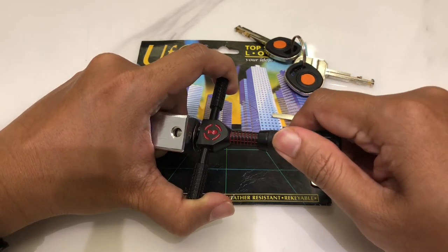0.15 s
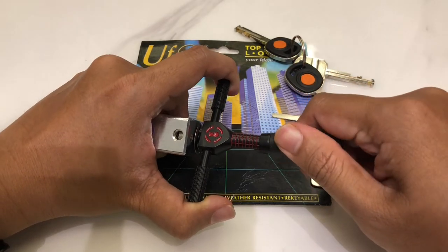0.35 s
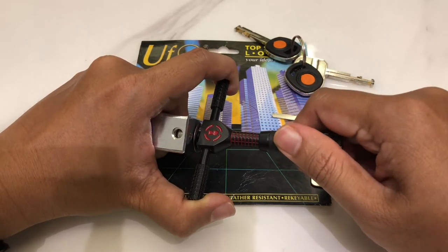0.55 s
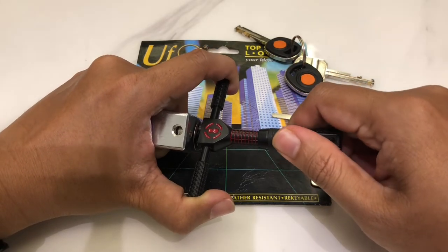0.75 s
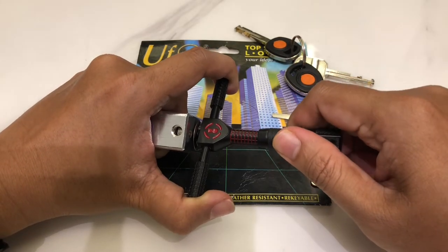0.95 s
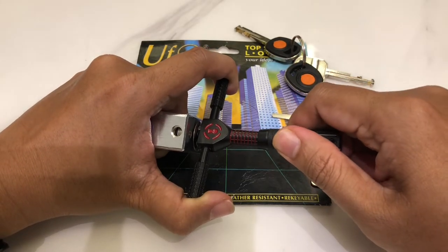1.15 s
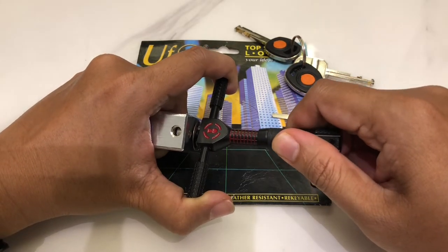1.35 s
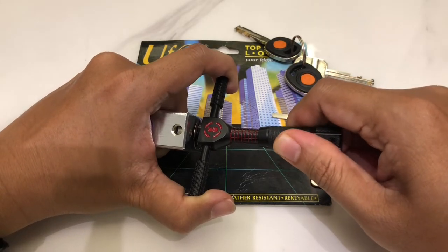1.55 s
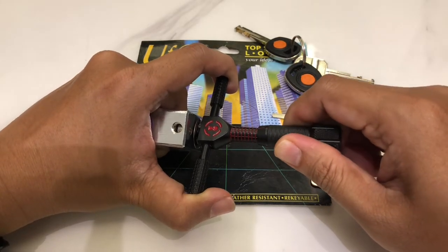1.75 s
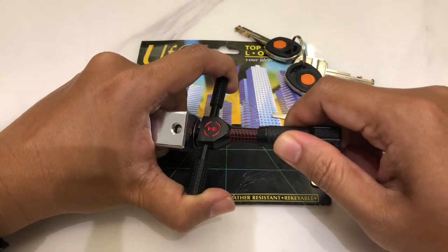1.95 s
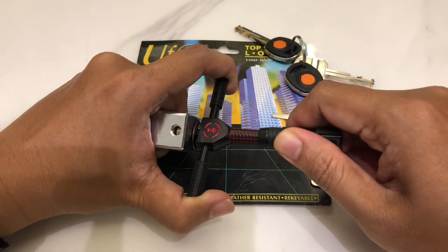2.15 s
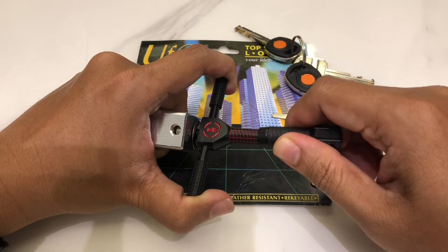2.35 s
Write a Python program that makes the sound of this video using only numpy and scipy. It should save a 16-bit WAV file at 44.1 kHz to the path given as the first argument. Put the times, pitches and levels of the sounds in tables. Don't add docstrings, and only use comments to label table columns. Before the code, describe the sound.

Padlock picked in the hands: faint ticks, a loud crisp metal snap, a long pause with barely audible skin rubs, then a softer tiny chattering click. Recorded close by phone, with soft low hum and short room echo.

```python
import sys
import numpy as np
from scipy import signal
from scipy.fft import rfft, irfft
from scipy.io import wavfile
from scipy.ndimage import uniform_filter1d

SR = 44100
rng = np.random.default_rng(int(sys.argv[2]) if len(sys.argv) > 2 else 0)


def generate_wav(signal):
    frames = np.transpose(np.atleast_2d(signal))
    scaled = np.clip(frames, -1, 1) * 32767
    pcm = np.round(scaled).astype(np.int16)
    wavfile.write(sys.argv[1], SR, pcm)


def linear_from_db(decibels):
    return 10 ** (np.asarray(decibels, float) / 20)


N = 110250

TIP_HZ = [1600, 2400, 3500, 4350, 5050, 6600, 7680, 8300, 10300, 12200, 13200, 14410, 15520, 16400]
# level_db, t60_s
TIP_MODES = [(-29, .005), (-25, .008), (-20, .004), (-21, .006), (-29, .004), (-16, .005), (-9, .008),
             (-12, .005), (-5, .0025), (-20, .004), (-8, .003), (0, .009), (-16, .008), (-11, .003)]
DISC_HZ = [1500, 2050, 2750, 3350, 4700, 6400, 7900, 9200, 10700, 11600, 13700, 14900, 15400]
# level_db, t60_s
DISC_MODES = [(-15, 0.0022), (-3.5, 0.0058), (-5, 0.0049), (4, 0.003), (3, 0.0044), (-4.5, 0.0074),
              (-1, 0.0025), (-5, 0.0054), (-27, .004), (0, 0.0039), (-23, 0.0029), (-2, 0.0045),
              (-7, 0.012)]

SNAP_S = [
    .23365,
    .23428,
    .2373,
    .2387,
    .2112,
    .2228,
]
SNAP_DB = [-33, -10, -33, -37, -57, -60]
SNAP_TILT_DB = [0, 0, -6, -5, 0, 0]
CHATTER_S = [1.6043, 1.6049, 1.6055, 1.6062, 1.607, 1.6076, 1.6086, 1.6094]
# level_db, tilt_db_per_octave
CHATTER_FORCES = [(-43, 3), (-43, 3), (-32.5, -1.5), (-45, 3), (-38, 3), (-35, 1), (-43, 10), (-50, -2)]

# start_s, level_db, pitch_hz, length_cycles
TICKS = [(.0165, -60, 12500, 8), (.0168, -63, 7000, 6), (.1032, -46, 950, 2.5), (.1043, -48, 700, 2.5),
         (.1155, -53, 1000, 3), (.1218, -47, 14800, 30), (.1221, -54, 12000, 16), (.1222, -58, 9000, 10),
         (.1229, -48, 800, 2.5), (.1238, -50, 8000, 8), (.1244, -40, 6700, 9), (.1244, -55, 14500, 16),
         (.1245, -56, 12000, 12), (.1254, -46, 4200, 9), (.1262, -51, 2600, 6), (.1272, -55, 1600, 4),
         (.1287, -47, 6400, 10), (.1288, -60, 12500, 10), (.1303, -55, 1800, 4), (.1325, -49, 900, 3),
         (.2345, -42, 750, 2.5), (.2355, -39, 2200, 6), (.2371, -43, 4300, 9), (.2386, -45, 12000, 12),
         (.2392, -48, 6000, 9), (.239, -47, 2300, 6), (.2605, -52, 800, 5), (.278, -52, 1000, 5),
         (1.6054, -47, 1250, 4), (1.6102, -48, 15400, 70), (1.6068, -43, 6400, 12), (1.6138, -54, 4700, 10),
         (1.9025, -60, 8500, 18), (1.9027, -65, 13000, 10), (1.953, -61, 2900, 8), (1.954, -66, 10500, 8)]
# start_s, length_s, level_db, centre_hz, width_hz
RUBS = [
    (1.388, .035, -74, 2600, 1800),
    (1.95, .12, -78, 3500, 3500),
    (2.15, .5, -74, 12500, 11000),
    (.7, .2, -80, 4500, 4000),
    (.1215, .0055, -60, 6000, 10000),
    (.085, .07, -57, 180, 250),
    (.128, .003, -68, 9000, 9000),
    (.0158, .002, -64, 10000, 8000),
    (.238, .058, -66, 500, 4500),
    (.235, .13, -59, 160, 90),
]
RUB_GAIN_DB = [3, 0, .1, .1, 2.5, 2, 2, -2.5, 5, 2]

# centre_hz, width_hz, gain_db
SNAP_SIDES = [(1200, 1500, 0.5), (3000, 1700, -1.5), (5770, 1800, 6), (7684, 760, -7.5), (8700, 700, 4.5),
              (12000, 2300, 0.5), (14300, 560, -8.5), (15200, 900, 4.5)]
# centre_hz, width_hz, gain_db
CHATTER_SIDES = [(2000, 1500, -3), (5000, 3000, -3), (10000, 6000, -1), (15500, 800, 11)]

# pitch_hz, level_db_per_hz
AIR = [(25, -65), (40, -15.5), (130, -8), (320, -7.5), (520, -15.5), (1500, -24.5), (5000, -34.5),
       (11000, -39), (15500, -37)]
# centre_hz, width_hz, gain_db over the air
HUM = [(48.3, 4.3, 17.5), (101, 8.8, 13.5), (157.5, 18, 9), (200.3, 4.5, 11), (248.1, 52, 8),
       (311.8, 53, 5.5), (383.5, 17, 6), (603.5, 80, -6), (847, 220, 5), (2310, 200, 1.5), (3420, 350, 10)]
# pitch_hz, level_db
MAINS = [(49.5, -74.5), (98.46, -65.5), (199.5, -67), (158.5, -69.5)]

RISE_S = .0001
CHOKE_DB_S = 9000


def disc_snap():
    forces = zip(SNAP_DB, SNAP_TILT_DB)
    return strikes(TIP_HZ, TIP_MODES, SNAP_S, forces, crack_db=-11, choke_s=.0034)


def disc_chatter():
    return strikes(DISC_HZ, DISC_MODES, CHATTER_S, CHATTER_FORCES, crack_db=2.5)


def strikes(pitch_hz, modes, starts, forces, crack_db, choke_s=1):
    pitch_hz = np.array(pitch_hz)
    mode_db, t60_s = np.array(modes).T
    t = np.arange(N) / SR
    scatter_db = -4.5 * rng.standard_normal((len(starts), len(pitch_hz)))
    grit = shaped(rng.standard_normal(N), lambda f: -12 * np.log2(1 + 1500 / f))
    octaves = np.log2(pitch_hz / 6000)
    out = 0
    for start, (hit_db, tilt_db), chance_db in zip(starts, forces, scatter_db):
        decay_db = -60 * np.clip(t - start, 0, .05) / .004
        crack = (t > start) * linear_from_db(hit_db + crack_db + decay_db) * grit
        level_db = hit_db + mode_db + tilt_db * octaves + chance_db
        out = out + crack + ring(start, pitch_hz, level_db, t60_s, choke_s)
    return out


def ring(start_s, pitch_hz, level_db, t60_s, choke_s=1):
    out = np.zeros(N)
    on = slice(int(start_s * SR), int(start_s * SR) + 3000)
    t = np.maximum(np.arange(N)[on] / SR - start_s, 0)
    pitch_hz, level_db, t60_s = (np.reshape(v, (-1, 1)) for v in (pitch_hz, level_db, t60_s))
    sense = (-1) ** np.arange(len(pitch_hz))[:, None]
    choke_db = CHOKE_DB_S * np.maximum(t - choke_s, 0)
    envelope = linear_from_db(level_db - 60 * t / t60_s - choke_db)
    modes = sense * envelope * np.sin(2 * np.pi * pitch_hz * t)
    onset = 1 - np.exp(-(t / RISE_S) ** 2)
    out[on] = onset * np.sum(modes, axis=0)
    return out


def ticks():
    out = 0
    for start, level_db, pitch_hz, cycles in TICKS:
        t60_s = np.log(1000) * cycles / pitch_hz / np.pi
        out = out + ring(start, pitch_hz, level_db, t60_s)
    return out


def rubs():
    t = np.arange(N) / SR
    out = 0
    for (start, length, level_db, centre, width), gain_db in zip(RUBS, RUB_GAIN_DB):
        grain = rng.standard_normal(N) * linear_from_db(walk(260))
        hiss = unit(shaped(grain, lambda f: -12 * ((f - centre) / width) ** 2))
        swell = np.sin(np.pi * np.clip((t - start) / length, 0, 1) ** .7)
        out = out + linear_from_db(level_db + gain_db) * hiss * swell
    return out


def room(x):
    t60_s, early_s, early_db, gap_s = .3, .056, 3, .003
    t = np.arange(SR // 2) / SR
    tail_db = -60 * np.maximum(t - early_s / 2, 0) / t60_s
    shape = linear_from_db(-32 + tail_db + early_db / (1 + (t / early_s) ** 12))
    fade_in = np.clip(t / gap_s, 0, 1) ** 2
    echo = rng.standard_normal(len(t)) * shape * fade_in / np.sqrt(SR / 100)
    dulled = shaped(x, lambda f: -5 * np.log2(np.maximum(f, 300) / 8000))
    return signal.fftconvolve(dulled, echo)[:N]


def air():
    hz, db = np.array(AIR).T
    noise = shaped(rng.standard_normal(N), lambda f: np.interp(np.log(f), np.log(hz), db) + humps(f, HUM))
    edges_hz = [0, 180, 500, 1500, 5000, SR]
    out = 0
    for low, high in zip(edges_hz, edges_hz[1:]):
        band = shaped(noise, lambda f: np.where((f > low) & (f <= high), 0, -200))
        out = out + band * linear_from_db(0.42 * walk(36))
    return linear_from_db(-57.5) * unit(out)


def mains():
    t = np.arange(N) / SR
    out = 0
    for pitch_hz, level_db in MAINS:
        out = out + linear_from_db(level_db - 1 + 5.5 * walk(7.7)) * np.sin(2 * np.pi * pitch_hz * t)
    return out


def humps(f, rows):
    return sum(gain_db / (1 + (2 * (f - centre) / width) ** 2) for centre, width, gain_db in rows)


def shaped(x, db_of):
    f = np.maximum(np.fft.rfftfreq(len(x), 1 / SR), 1)
    return irfft(rfft(x) * linear_from_db(db_of(f)), len(x))


def unit(x):
    return x / np.sqrt(np.mean(x ** 2))


def walk(rate_hz):
    k = int(SR / rate_hz)
    slewed = uniform_filter1d(rng.standard_normal(N), k)
    return unit(uniform_filter1d(slewed, k))


def scene():
    snap = disc_snap()
    chatter = disc_chatter() + ticks()
    snap_sides = shaped(snap, lambda f: humps(f, SNAP_SIDES))
    chatter_sides = shaped(chatter, lambda f: humps(f, CHATTER_SIDES))
    quiet = room(snap_sides + chatter_sides) + rubs() + air() + mains()
    quiet = shaped(quiet, lambda f: -40 / (1 + (15820 / f) ** 200))
    return (snap + chatter + quiet)[None]


def roll_off(x):
    return signal.sosfilt(signal.butter(12, 17140, fs=SR, output="sos"), x)


def record(dry):
    top_hz = 17150
    cut = shaped(dry[0], lambda f: -60 / (1 + (top_hz / f) ** 60))[None]
    return roll_off(cut)


dry = scene()
out = record(dry)
generate_wav(out)
```